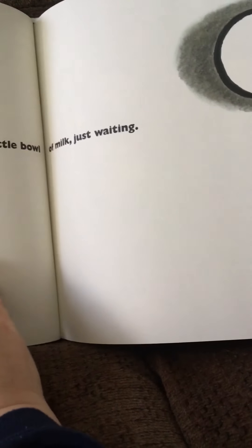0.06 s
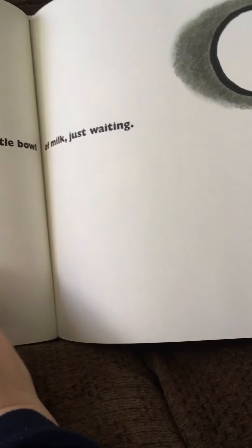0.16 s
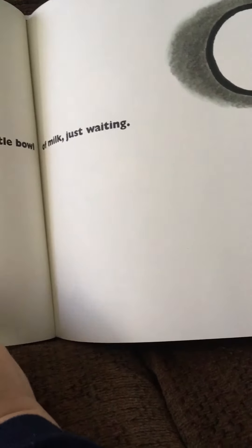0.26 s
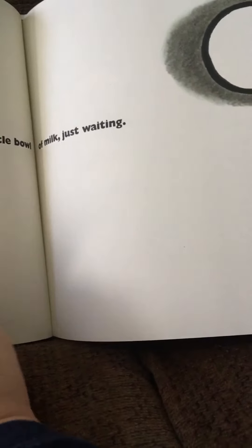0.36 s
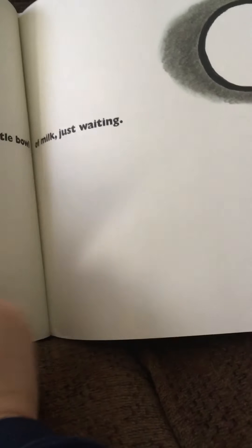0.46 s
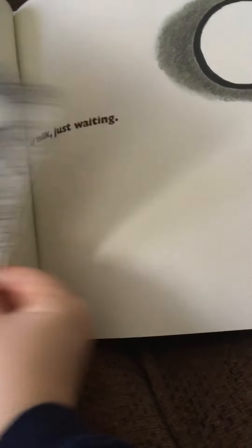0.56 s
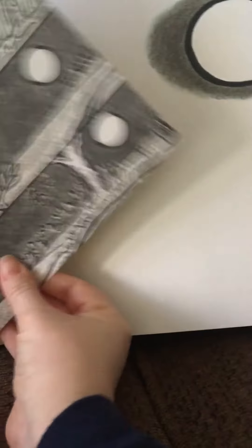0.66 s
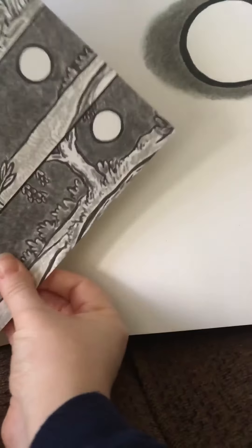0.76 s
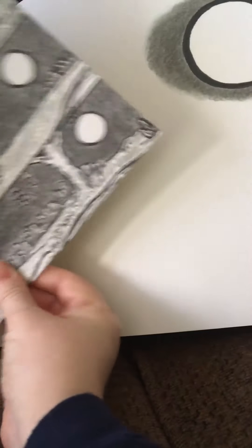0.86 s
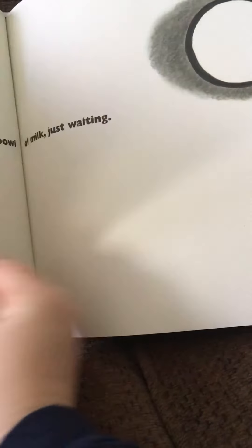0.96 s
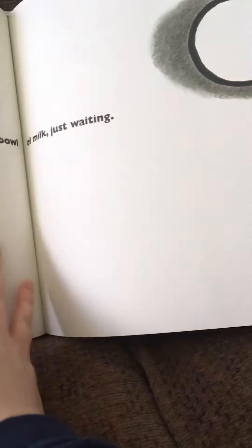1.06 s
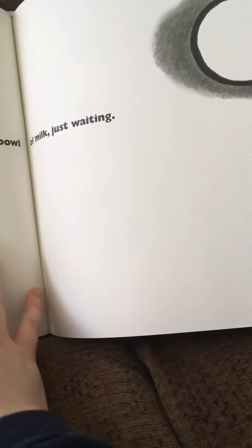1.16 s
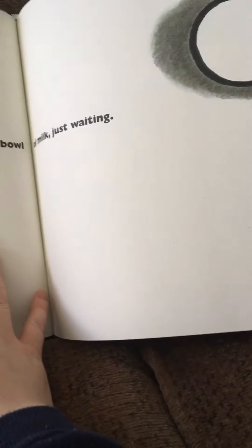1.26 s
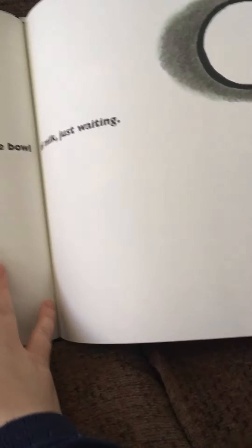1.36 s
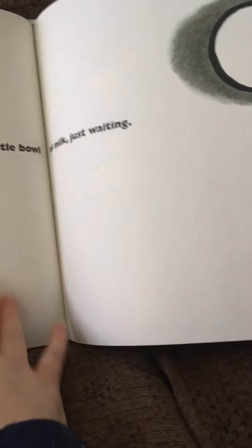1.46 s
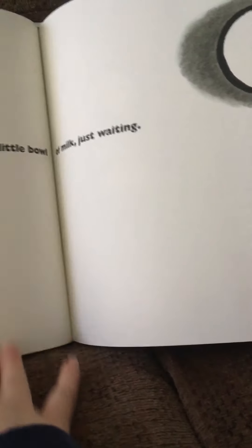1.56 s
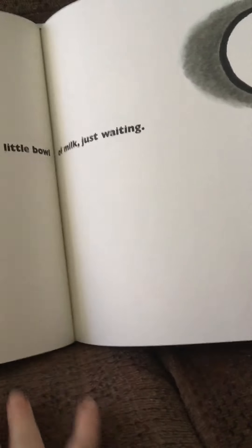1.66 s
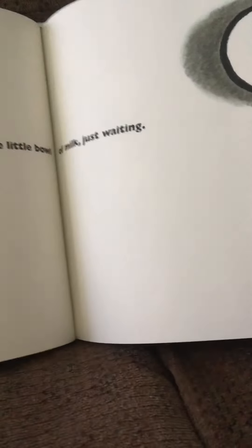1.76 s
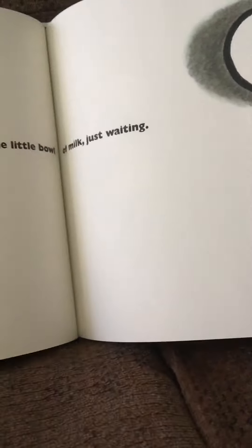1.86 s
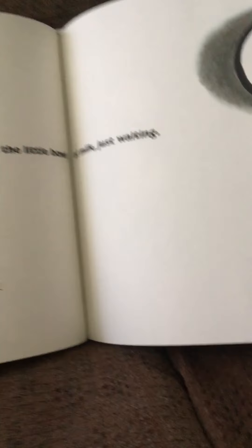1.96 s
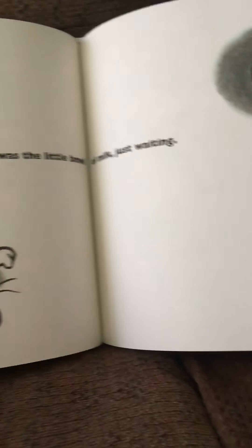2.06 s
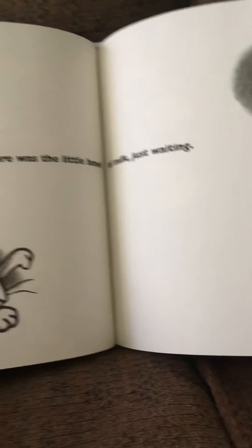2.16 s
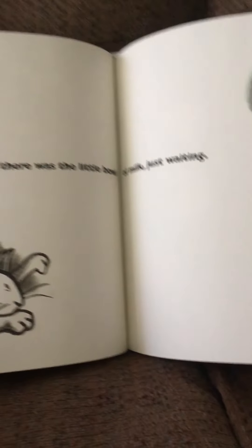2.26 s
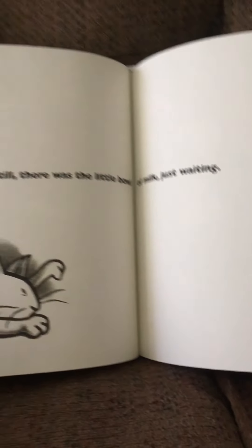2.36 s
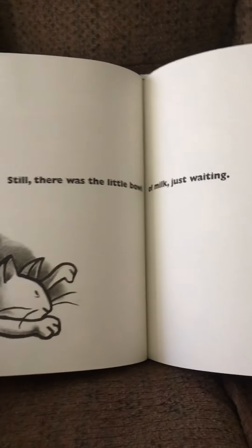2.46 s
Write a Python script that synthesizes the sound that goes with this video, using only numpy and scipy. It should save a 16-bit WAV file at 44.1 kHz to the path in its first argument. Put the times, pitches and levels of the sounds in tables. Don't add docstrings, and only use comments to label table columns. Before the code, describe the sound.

A hand turns a stiff book page close to a phone microphone: faint paper sliding, then a burst of crisp snaps and scrapes with low air puffs, fading to light rubs in a quiet small room.

```python
import sys
import numpy as np
from scipy import signal
from scipy.fft import rfft, irfft
from scipy.io import wavfile
from scipy.ndimage import uniform_filter1d

SR = 44100
rng = np.random.default_rng(int(sys.argv[2]) if len(sys.argv) > 2 else 0)


def nominal_scale(level):
    x = np.asarray(level, float) / 20
    return 10 ** x


def digitize_waveform(pressure):
    field = np.atleast_2d(pressure).T
    bounded = np.clip(field, -1, 1)
    quanta = np.round(bounded * 32767).astype(np.int16)
    wavfile.write(sys.argv[1], SR, quanta)


N = 110250


def evened(x):
    return x / np.sqrt(np.mean(x ** 2) + 1e-20)


def colour(x, points):
    hz = abs(np.fft.fftfreq(8192, 1 / SR))
    f, level_db = np.transpose(points)
    log_gain = np.log(nominal_scale(np.interp(np.log(hz + 1), np.log(f + 1), level_db)))
    taps = np.fft.ifft(np.exp(np.conj(signal.hilbert(log_gain)))).real[:4096]
    return signal.oaconvolve(x, taps / np.linalg.norm(taps))[:len(x)]


def add(mix, s, sound):
    part = mix[round(s * SR):][:len(sound)]
    part += sound[:len(part)]


def wander(width_s):
    size = max(int(width_s * SR), 1)
    once = uniform_filter1d(rng.standard_normal(N), size)
    return evened(uniform_filter1d(once, size))


def grit(spread_db):
    clumps_db = 1.1 * wander(.003) + .6 * wander(.02)
    catch_db = spread_db * np.minimum(rng.exponential(1, N), 6)
    return evened(nominal_scale(catch_db + clumps_db) * rng.standard_normal(N))


def ring(modes, luck, t, rise_s):
    x = np.zeros(len(t))
    for (hz, db, t60), (pitch, level, phase) in zip(modes, luck):
        fade = nominal_scale(db + 1.5 * level - 60 * t / t60)
        x += fade * np.sin(2 * np.pi * hz * (1 + .06 * pitch) * t + .4 * phase)
    x *= np.minimum(t / rise_s, 1) ** 2
    return x / abs(x).max()


# frequency in Hz, level in dB per Hz.
ROOM_COLOUR = [(22, -50.5), (42, 11), (65, 9), (130, -31.5), (200, -12), (450, -17.5), (850, -12),
               (3000, -31), (16000, -91.5)]


def room_hum():
    return nominal_scale(-64 + 1.0 * wander(0.16)) * colour(rng.standard_normal(N), ROOM_COLOUR)


# time in
# seconds, pressure in dB, share of sheet body in dB, air push in dB.
STROKES = [
    (0, -55, -7.5, -63),
    (0.042, -50.5, -6, -66),
    (0.066, -60, -6.5, -63.5),
    (0.119, -60, -6.5, -69),
    (0.132, -49, -7.5, -53),
    (0.202, -46.5, -6.5, -77),
    (0.241, -42, 1, -60),
    (.305, -40.5, -7, -86),
    (0.345, -47.5, 0, -51.5),
           (.355, -50.5, -9.5, -66),
    (0.392, -50.5, -3.5, -51),
    (0.476, -47, 2.5, -42.5),
    (.54, -52.5, 0, -72),
    (.55, -51.5, -0.5, -48.5),
    (.65, -58, 1, -50.5),
    (.71, -48, -7, -44.5),
    (0.748, -44.5, -3, -49),
    (.765, -67, 4, -59),
           (.81, -77, 5, -47.5),
    (.83, -55, 2, -54),
    (.87, -52.5, 1, -62),
    (0.913, -41.5, -7.5, -45),
    (0.974, -37, -9, -57),
    (0.986, -56.5, 5.5, -56),
    (1.061, -52, 3, -45),
    (1.125, -53, -2, -53.5),
    (1.14, -60.5, -1.5, -53),
           (1.296, -68, 3, -67), (1.31, -56.5, -6, -64), (1.51, -46, -12.5, -64), (1.6, -52.5, -5, -61.5),
         (1.91, -53, -11, -64.5), (2.0, -62, -11, -67), (2.02, -55.5, -8.5, -62.5),
         (2.168, -58.5, -14, -64.5), (2.22, -70.5, -5.5, -71.5), (2.32, -60, -10, -65.5),
         (2.38, -67.5, -8, -65.5), (2.5, -70, -8, -65.5)]


def hand_strokes():
    s, press_db, body_db, push_db = np.transpose(STROKES)
    t = np.arange(N) / SR
    return [np.interp(t, s, level_db) for level_db in (press_db, body_db, push_db)]


# frequency in Hz, level in dB per Hz.
PUSH_COLOUR = [(25, -41), (45, -9.5), (70, -1), (110, -9), (200, -10), (400, -17.5), (900, -37.5)]


def air_push(push_db):
    return nominal_scale(push_db + 0.14 * wander(0.017)) * colour(rng.standard_normal(N), PUSH_COLOUR)


# start in seconds, peak in dB, pitch in Hz.
PUFFS = [(0.394, -36, 217), (.56, -37.5, 107), (0.666, -43.5, 150), (0.731, -47, 75), (0.827, -47, 91),
         (0.88, -41.5, 193), (0.906, -42.5, 99), (.9, -47, 55), (1.055, -45, 159.6), (1.073, -46, 100),
         (1.17, -48.5, 136), (1.31, -52, 159), (1.68, -56.5, 55), (1.716, -57, 151), (2.139, -55, 55.4),
         (2.168, -50.5, 55)]


def air_puffs():
    out, cycles = np.zeros(N), 3.34
    for start, peak_db, hz in PUFFS:
        turns = np.arange(0, cycles, hz / SR)
        swell = np.sin(np.pi * turns / cycles)
        add(out, start, nominal_scale(peak_db) * swell * np.sin(2 * np.pi * turns))
    return out


# frequency in Hz, level in dB per Hz.
FIZZ_COLOUR = [(300, -8), (1500, -8), (3500, -9.5), (6300, 1.5), (9000, 3), (14400, 5), (15700, 2.5)]


def friction_fizz():
    return colour(grit(.8), FIZZ_COLOUR)


# frequency in Hz, level in dB per Hz.
BODY_COLOUR = [(200, -15.5), (450, -19.5), (750, -5), (1200, -5.5), (1900, -8), (3500, -9), (6500, -12.5),
               (12000, -31)]


def slides(press_db, body_db, fizz, catches):
    return nominal_scale(press_db) * (fizz + nominal_scale(body_db) * colour(catches, BODY_COLOUR))


# start in seconds, length in seconds, fizz in dB, hum in dB, hum pitch in Hz.
SCRAPES = [(-0.002, 0.07, -65, -73, 866), (0.127, 0.019, -63, -62.5, 1150), (0.243, 0.03, -69, -50, 1500),
           (0.298, 0.02, -58, -54, 1900), (0.404, 0.0093, -57, -41, 1500), (0.434, 0.012, -51, -35.5, 1670),
           (0.465, 0.013, -57, -37.5, 1100), (0.59, 0.009, -55, -45, 2580), (0.815, 0.006, -63, -50, 1700),
           (0.876, 0.011, -51, -44, 660), (0.901, 0.0057, -41, -46, 1000), (0.96, 0.0071, -63, -51, 1190),
           (0.966, 0.033, -56, -44.5, 1380), (0.994, 0.0164, -49, -42, 1400),
           (0.999, 0.012, -51, -44.5, 3200), (1.034, 0.021, -39, -46, 3080),
           (1.051, 0.008, -38.5, -46, 3530), (1.053, 0.025, -77, -46, 980), (1.193, 0.077, -68, -66, 1660),
           (1.578, 0.051, -61.5, -65, 1660), (1.906, 0.025, -72, -66, 1200), (2.034, 0.074, -75, -67, 885),
           (2.241, 0.0025, -68, -84.5, 1000), (2.404, 0.0058, -73.5, -88, 1000)]


def scrapes(fizz, catches):
    out, t = np.zeros(N), np.arange(N) / SR
    spread = 1 + 0.79 / 2
    for start, length, fizz_db, hum_db, hz in SCRAPES:
        u = (t - start) / length
        shape = np.clip(np.minimum(u / 0.28, (1 - u) / 0.089), 0, 1)
        band = signal.butter(2, [hz / spread, hz * spread], "band", fs=SR)
        hum = evened(signal.lfilter(*band, catches))
        out += shape * (nominal_scale(fizz_db) * fizz + nominal_scale(hum_db) * hum)
    return out


# start in seconds, peak in dB, pitch in Hz.
PINGS = [(.3965, -25, 745), (.3965, -27.5, 940), (.3965, -23, 1330), (.397, -31, 5750), (.401, -36, 5700),
         (.3995, -31, 900), (.4085, -35.5, 1380), (.428, -18, 614), (.428, -22, 996), (.428, -17.5, 1240),
         (.428, -23, 3710), (.428, -29, 6880), (.428, -30, 5510), (.4395, -29.5, 1290), (.462, -20, 590),
         (.462, -18, 1240), (.462, -21.5, 2260), (.462, -19, 3500), (.4735, -25, 1140), (.5585, -16, 670),
         (.5585, -12.5, 1310), (.5585, -26.5, 2220), (.5705, -33, 1150), (.586, -19, 660),
         (.586, -19, 1074), (.586, -20, 1317), (.5925, -40, 3200), (.6635, -16.5, 810),
         (.6635, -18.5, 1437), (.6635, -18.5, 1715), (.663, -28, 5920), (.682, -36, 1310), (.696, -23, 933),
         (.696, -33, 650), (.696, -31, 1830), (.696, -29, 4850), (.696, -29.5, 7000), (.8052, -22, 720),
         (.8052, -24.5, 1020), (.805, -30, 1790), (.8055, -32, 2220), (.877, -28, 780), (.877, -28, 1160),
         (.8922, -30.5, 818), (.8922, -28, 1330), (.9015, -32.5, 1840), (.9805, -29, 780),
         (.9825, -32, 1260), (.985, -30, 1430), (.9895, -34, 1660), (.996, -39, 1340), (.9995, -31.5, 3080),
         (1.0358, -32, 1580), (1.0362, -32.5, 2950), (1.0362, -31.5, 5050), (1.0395, -31, 5130),
         (1.0575, -38.5, 1000), (1.722, -52.5, 900)]


def panel_pings():
    out, t = np.zeros(N), np.arange(5000) / SR
    for s, peak_db, hz in PINGS:
        t60 = .0075 * (3500 / hz) ** .12
        add(out, s, nominal_scale(peak_db) * ring([(hz, 0, t60)], [(0.002, 0, 0.0035)], t, 0.001))
    return out


# start in seconds, peak in dB, sheet pitch in Hz,
# then crease ring and crack, each in dB against the thock.
SNAPS = [(.133, -50, 840, 6, -14), (0.3963, -22, 960, -3.5, -12.5), (0.3988, -21, 1026, -10, -18),
         (.428, -23.5, 1000, 5.5, -4.5), (0.462, -21, 1230, -11, -5.5), (.5585, -19.5, 1290, -4.5, -6.5),
         (.586, -21.5, 1100, -3, -11), (0.6633, -20, 1322, -4.5, -12), (0.695, -26, 940, -6.5, -8),
         (.805, -40, 920, -36, -41), (0.876, -34, 785, -5, -4), (.8922, -26.5, 970, -6.5, -13),
         (0.9011, -24.5, 1115, -4.5, -29), (0.9798, -38, 1030, -24, -45), (.985, -26.5, 1310, -38, -28),
         (.996, -27, 1310, -8, -9.5), (1.025, -41, 1450, -32, -18), (1.0359, -28, 1770, -1.5, -9),
         (1.0395, -27.5, 1920, -6, -14.5), (1.0556, -30, 1590, -4, -15), (1.315, -45.5, 606, -10, -26),
         (1.57, -45, 950, -16, -12), (2.127, -65.5, 1010, -23, 11.5)]
# multiple of the sheet pitch, level in dB, 60 dB fade in seconds.
SHEET_TONES = [(.62, -8, .009), (.82, -4, .008), (1.0, 0, .007), (1.3, -2, .006), (1.6, -5, .006),
               (2.1, -11, .006)]
# frequency in Hz, level in dB, 60 dB fade in seconds.
CREASE_TONES = [(2426, -1, 0.004), (3160, -1.5, 0.0058), (3680, -2.5, 0.007), (4300, -3, 0.0047),
                (5820, -3.5, 0.006), (7230, -11, 0.0075)]


def snaps():
    out, t = np.zeros(N), np.arange(5000) / SR
    thin = signal.butter(2, 477, "high", fs=SR)
    for s, peak_db, pitch_hz, crease_db, crack_db in SNAPS:
        luck = rng.uniform(-1, 1, (13, 3))
        sheet = [(k * pitch_hz, db, t60) for k, db, t60 in SHEET_TONES]
        thock = signal.lfilter(*thin, ring(sheet, luck, t, 0.00083))
        crease = ring(CREASE_TONES, luck[6:], t, 0.00057)
        crack_fade = nominal_scale(-60 * t / .008) + nominal_scale(-11 - 60 * (t / .018) ** 2)
        burst = rng.standard_normal(5000) * crack_fade * np.minimum(t / .0008, 1)
        crack = colour(burst, FIZZ_COLOUR[1:])
        crack /= abs(crack).max()
        flap_hz = 110 * (1 + .2 * luck[12, 0])
        flap = nominal_scale(-23.5 - 60 * t / 0.076) * np.sin(2 * np.pi * flap_hz * t) * np.minimum(t / 0.0044, 1)
        snap = thock + flap + nominal_scale(crease_db + 3.0) * crease + nominal_scale(crack_db + 9) * crack
        add(out, s, nominal_scale(peak_db) * snap)
    return out


# delay in seconds, level in dB.
ECHOES = [
    (.0032, -14),
    (.0112, -21),
    (.0128, -22),
    (.019, -24),
]


def room(x):
    tail_db, tail_t60, dull_hz = -14, 0.27, 2730
    t = np.arange(SR // 2) / SR
    tail = rng.standard_normal(len(t)) * nominal_scale(-60 * t / tail_t60) * (t > .005)
    taps = nominal_scale(tail_db) * tail / np.linalg.norm(tail)
    for delay, echo_db in ECHOES:
        add(taps, delay, nominal_scale(echo_db) * signal.unit_impulse(1))
    echoed = signal.fftconvolve(x, taps)[:N]
    return x + signal.lfilter(*signal.butter(1, dull_hz, fs=SR), echoed)


def scene():
    press_db, body_db, push_db = hand_strokes()
    fizz, catches = friction_fizz(), grit(2.8)
    air = air_push(push_db) + air_puffs()
    rubbing = slides(press_db, body_db, fizz, catches) + scrapes(fizz, catches)
    sharp = room(snaps() + panel_pings())
    edge = signal.firwin(401, 15800, window=("kaiser", 8), fs=SR)
    soft = signal.oaconvolve(room_hum() + air + rubbing + sharp, edge, "same")
    return np.tile(soft + nominal_scale(-28.5) * sharp, (2, 1))


def roll_off(x):
    return signal.sosfilt(signal.butter(12, 16830, fs=SR, output="sos"), x)


# frequency in Hz, width in Hz, depth in dB.
HOUSING_DIPS = [
    (4940, 180, -6.5),
    (7590, 1300, -3.5),
    (10430, 1100, -3),
]


def record(dry):
    hz = np.fft.rfftfreq(N, 1 / SR)
    dips_db = sum(db / (1 + ((hz - f) / width * 2) ** 2) for f, width, db in HOUSING_DIPS)
    bass_cut = 1 / np.sqrt(1 + (33 / (hz + 1)) ** 6)
    mix = irfft(rfft(dry) * nominal_scale(dips_db) * bass_cut, N)
    return roll_off(mix)


dry = scene()
out = record(dry)
digitize_waveform(out)
```